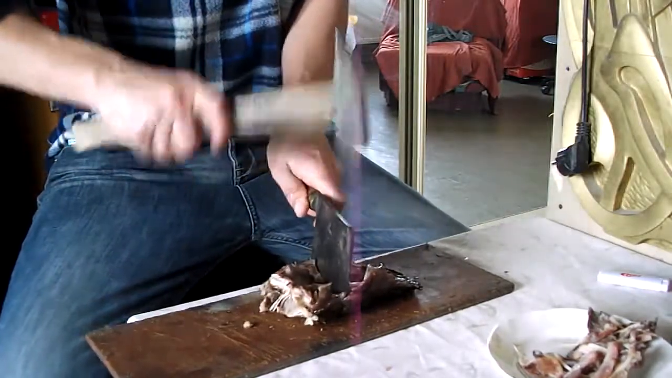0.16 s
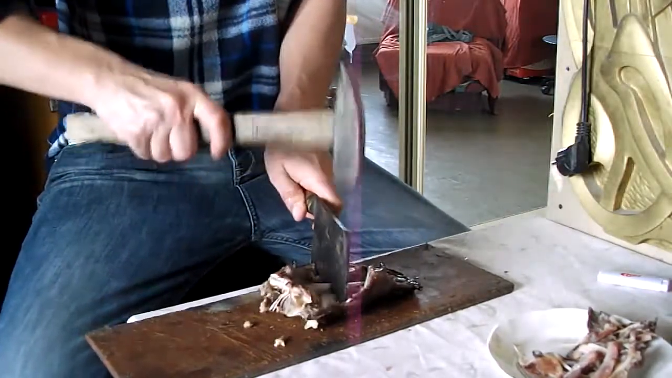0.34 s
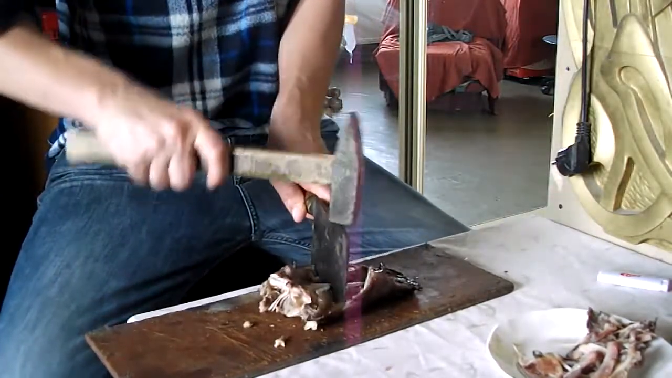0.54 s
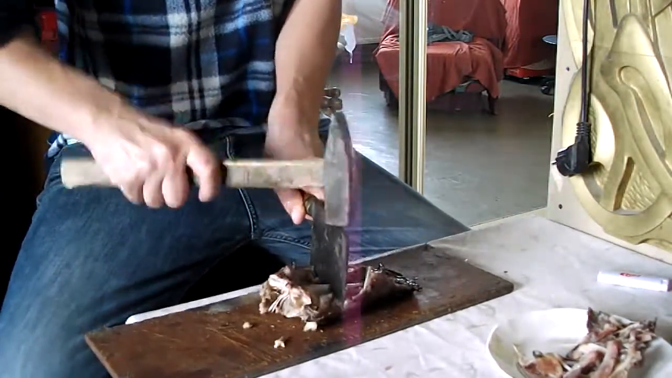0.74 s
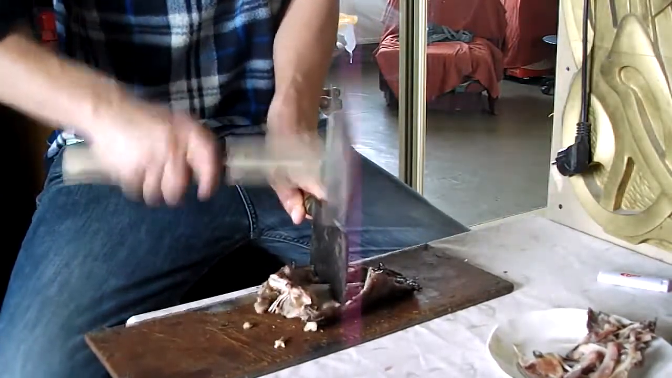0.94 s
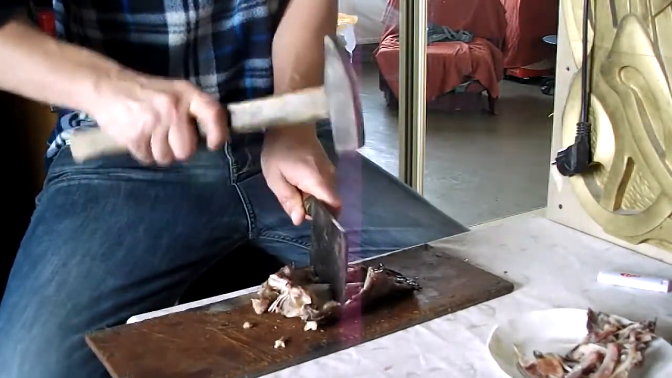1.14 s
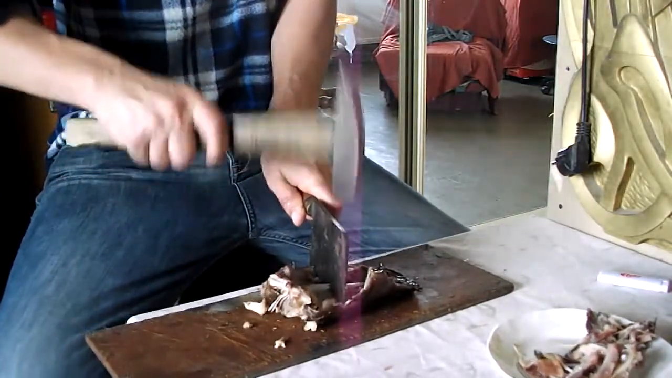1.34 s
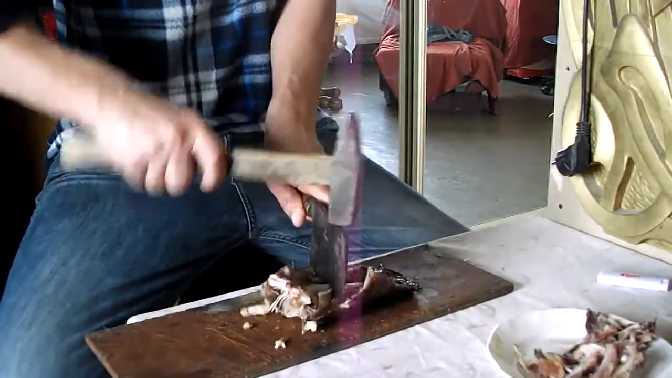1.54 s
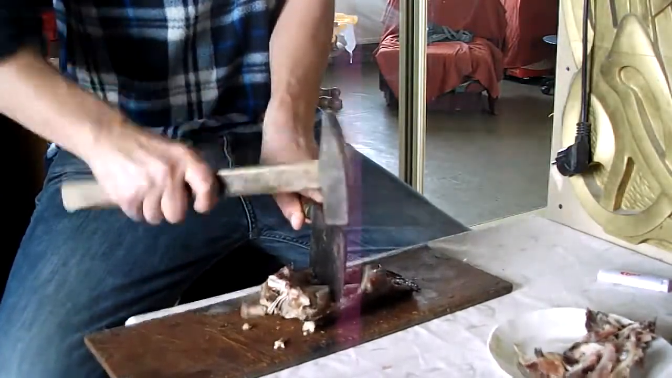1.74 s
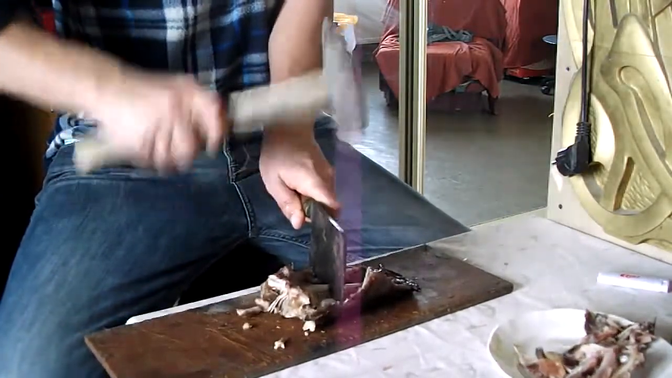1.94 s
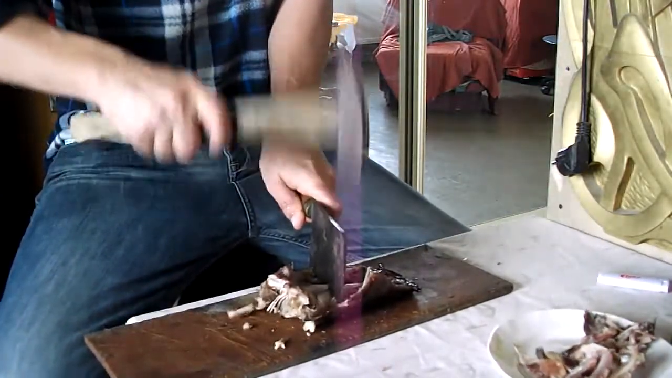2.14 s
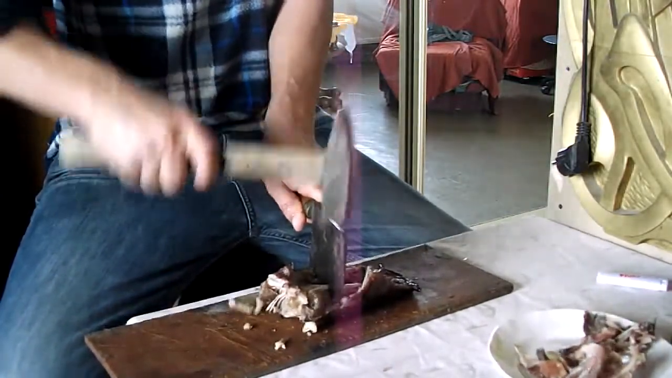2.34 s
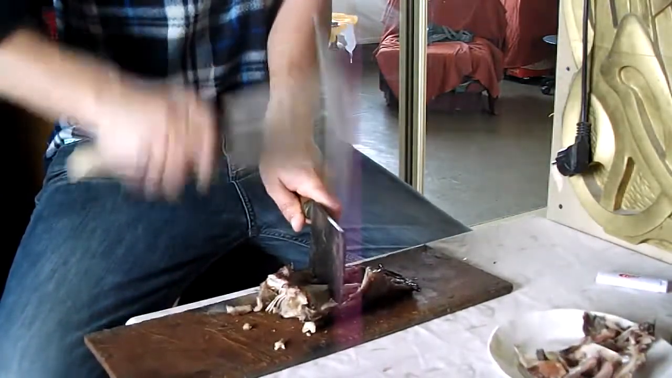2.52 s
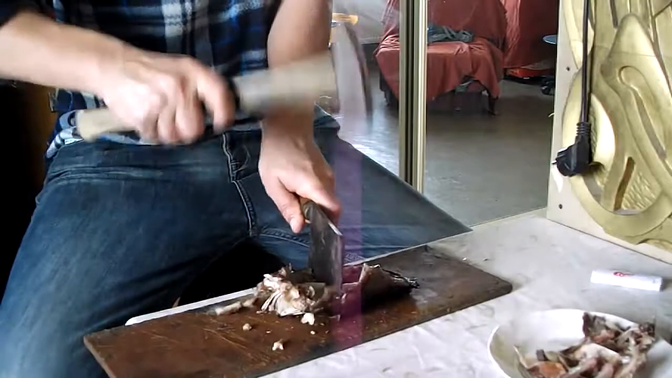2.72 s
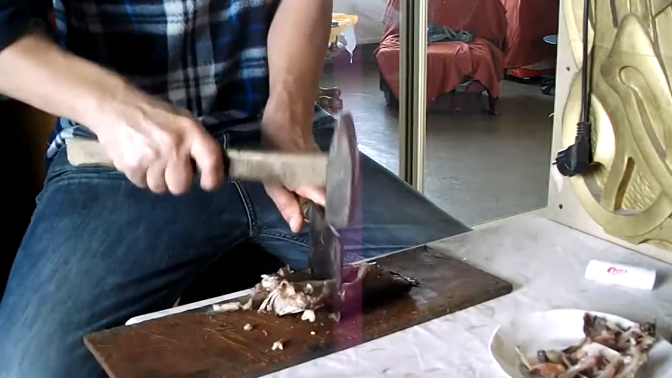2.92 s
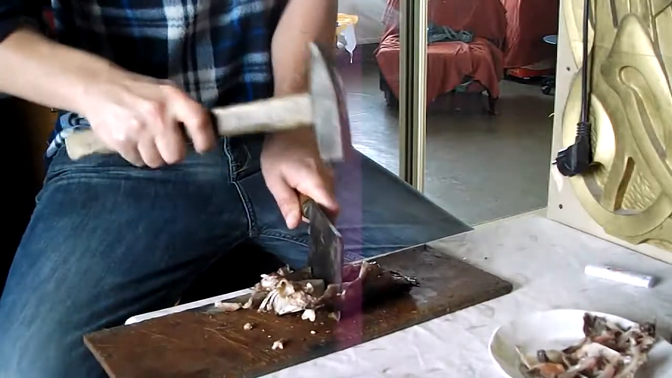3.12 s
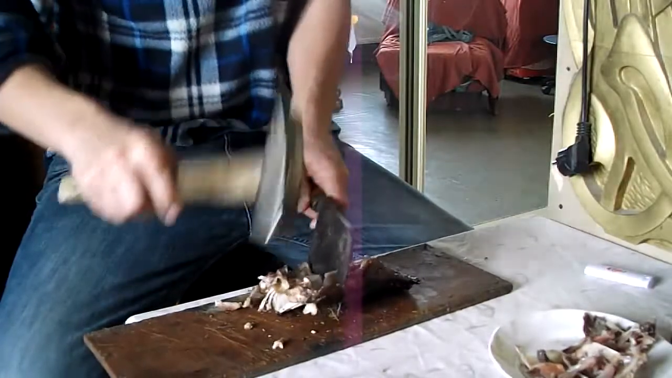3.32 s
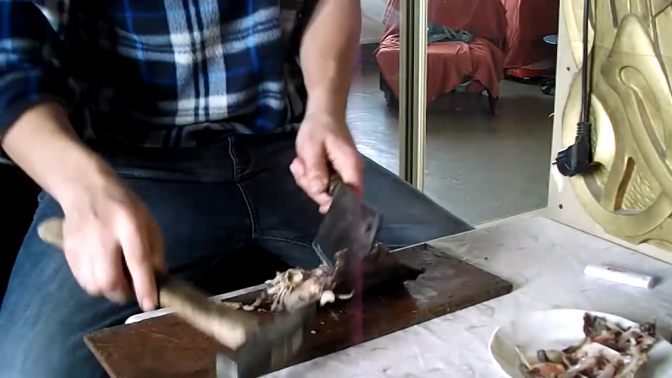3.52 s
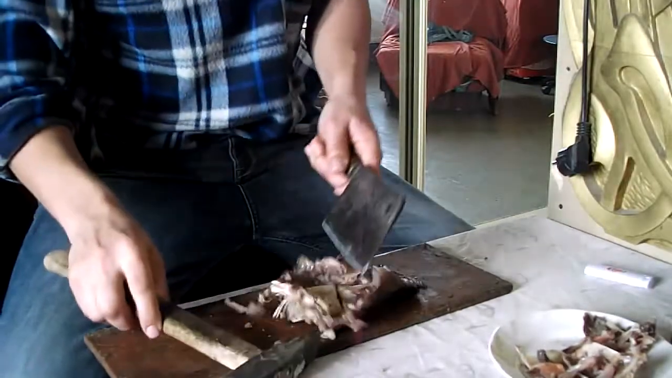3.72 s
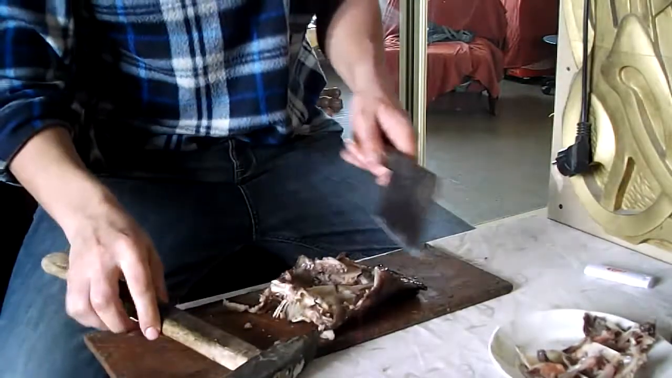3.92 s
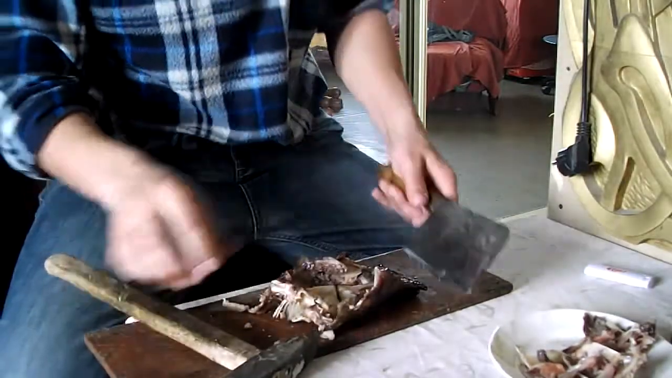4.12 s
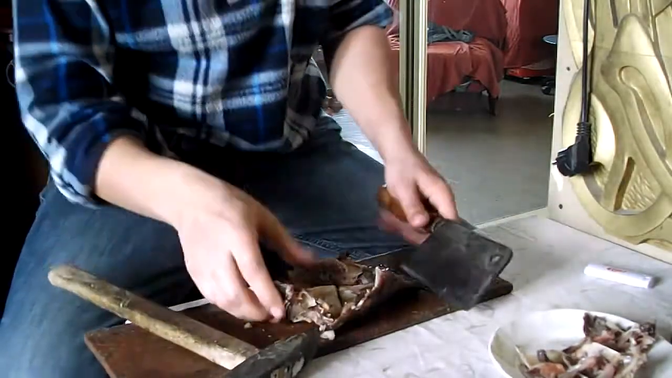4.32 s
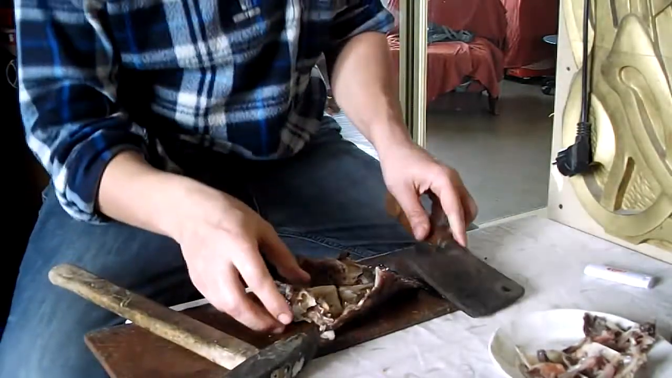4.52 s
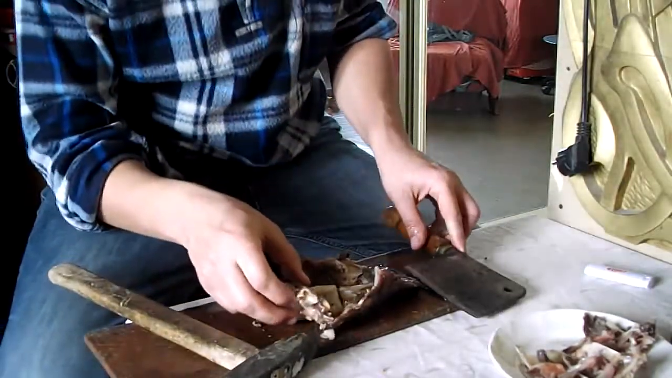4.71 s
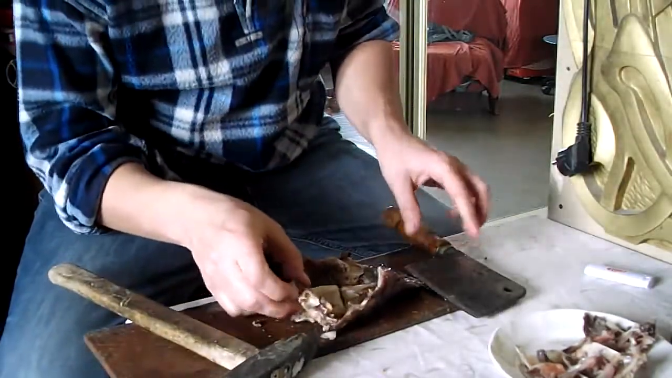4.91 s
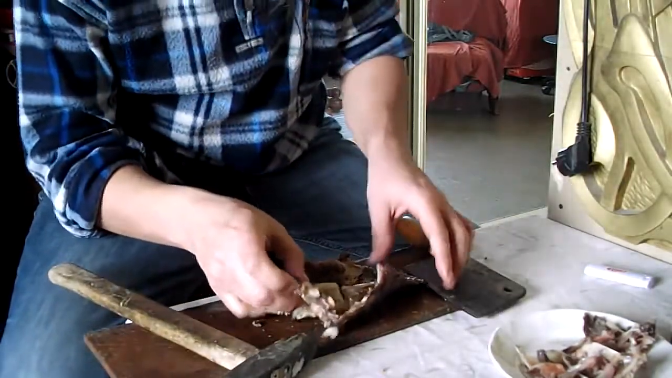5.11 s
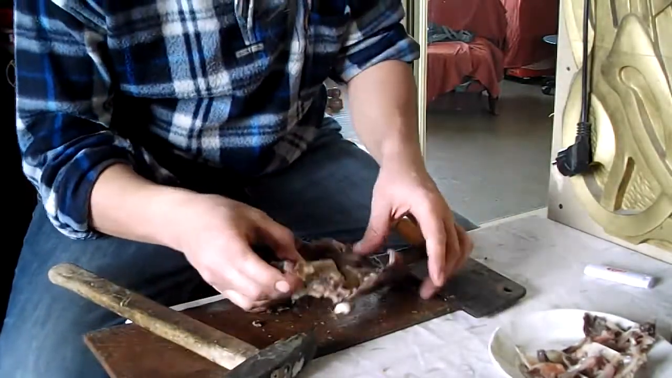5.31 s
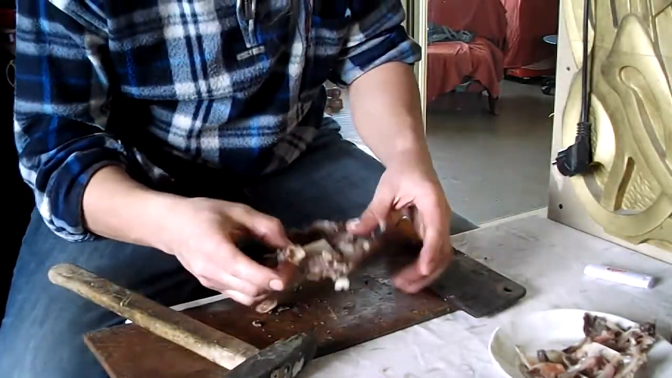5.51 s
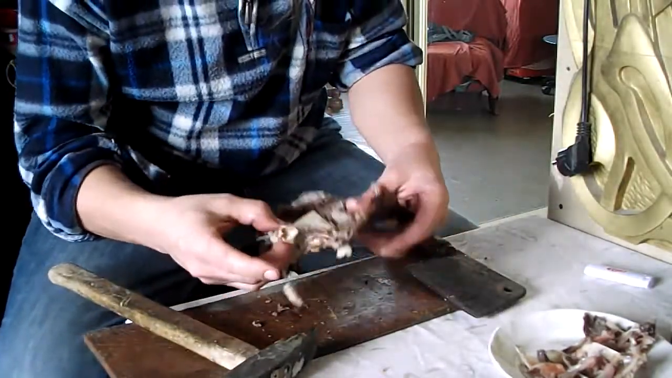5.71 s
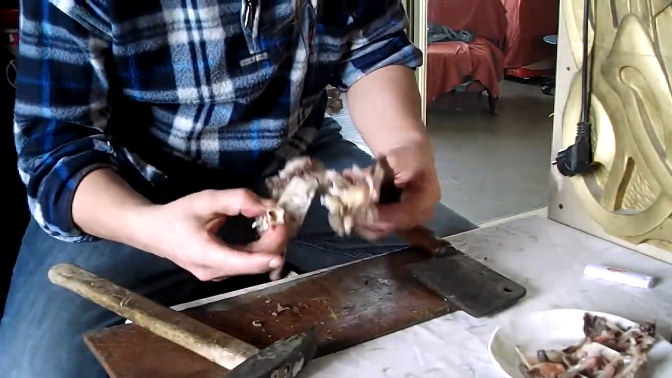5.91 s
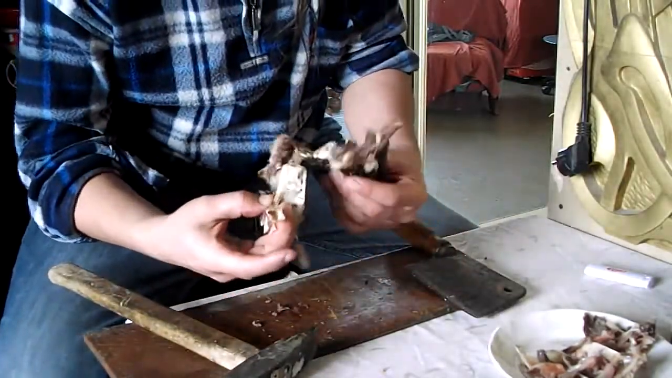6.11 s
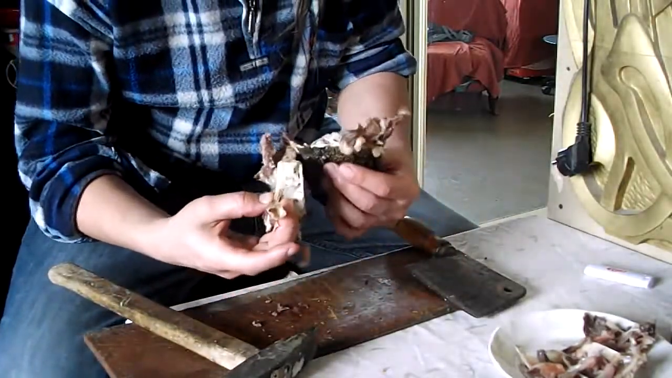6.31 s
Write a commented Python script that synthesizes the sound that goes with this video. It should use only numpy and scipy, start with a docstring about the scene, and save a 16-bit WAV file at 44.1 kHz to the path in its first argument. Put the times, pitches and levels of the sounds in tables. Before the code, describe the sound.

Regular hammering is already under way: bright steel clanks at first, then duller, heavier crunches as the blade wedges into bone over a wooden board. It stops around three seconds. A short scrape, clattering tools, a hard knock, soft rubbing and brittle cracks follow. The close microphone overloads on the blows, then automatic gain brings up hiss and electronic whine in a small hard room.

```python
"""A hammer drives a steel cleaver through a cooked fish bone on a wooden board: a steady run of blows in a bare kitchen.
Each blow is crunching noise, damped modes of blade and board, and a table swing; it overloads the close camera.
The gain control ducks, then lets filtered-noise hiss and a thin whine of sines back up. The blade scrapes free,
hammer and cleaver knock on the board, and hands rub and pull the bone apart in small wet snaps of resonant noise."""
import sys
import numpy as np
from scipy import signal
from scipy.fft import rfft, irfft, next_fast_len
from scipy.io import wavfile
from scipy.ndimage import map_coordinates

SR = 44100
rng = np.random.default_rng(int(sys.argv[2]) if len(sys.argv) > 2 else 0)


def dump(signal):
    """Clip the signal to [-1, 1] and save it as 16-bit WAV at the path in sys.argv[1]."""
    limited = np.clip(np.atleast_2d(signal).T, -1, 1)
    pcm = np.round(limited * 32767).astype(np.int16)
    wavfile.write(sys.argv[1], SR, pcm)


N = 284483
T = np.arange(SR * 3 // 4) / SR  # time axis of one event, in seconds

# spectrum of steel on steel and crushed bone: f/Hz, relative level per Hz/dB
CRUNCH_SPECTRUM = [(30, -21), (100, -6), (240, -11), (430, -1), (750, -6.5), (1250, -7.5), (1800, -0.5),
                   (3400, 0.5), (5400, -1.5), (7000, -10.5), (9000, -16), (11300, -11.5), (12200, -39.5)]


def amp(db):
    """Level to amplitude: 20 dB is a factor of ten."""
    return 10 ** (np.asarray(db) / 20)


def along(points, hz):
    """Interpolation of (f/Hz, value) points on a logarithmic frequency axis, as hearing scales pitch."""
    f, value = np.transpose(points)
    return np.interp(np.log(hz + 1), np.log(f), value)


def filtered(x, response):
    """Linear filtering: the spectrum is multiplied by a response of frequency."""
    n = x.shape[-1]
    padded = next_fast_len(n + 8192)
    spectrum = rfft(x, padded) * response(np.fft.rfftfreq(padded, 1 / SR))
    return irfft(spectrum, padded)[..., :n]


def noise(response, size):
    """Coloured noise: white noise shaped by a filter and scaled to rms 1."""
    x = filtered(rng.standard_normal(size), response)
    return x / x.std()


def fade(t60, t=T):
    """Exponential damping: the level falls 60 dB in t60 seconds."""
    return np.exp(-np.log(1000) * t / t60)


def add(track, s, sound):
    """Superposition: a sound is mixed into the track from time s on."""
    start = round(s * SR)
    part = sound[max(-start, 0):N - start]
    track[max(start, 0):][:len(part)] += part


def ring(modes, scatter_db, detune):
    """Modal synthesis: damped sines whose strength and pitch shift with the point of contact and the grip."""
    hz, db, t60 = np.transpose(modes)[:, :, None]
    size, shift = rng.standard_normal((2, len(modes), 1))
    side = (-1) ** np.arange(len(modes))[:, None]  # neighbouring modes swing opposite ways
    strength = side * amp(db + scatter_db * size)
    swing = np.sin(2 * np.pi * hz * (1 + detune * shift) * T)
    return np.sum(strength * fade(t60) * swing, 0)


def contact(spectrum, tilt_db, t60):
    """Impact noise: a hard contact is a short burst; tilt_db per octave brightens it."""
    colour = lambda hz: amp(along(spectrum, hz) + tilt_db * np.log2(hz + 200))
    return noise(colour, len(T)) * fade(t60)


def in_kitchen(x, wet_db, blur=0.045, build=0.014, late_db=-27, late_t60=0.57):
    """Reverberation: a diffuse echo of the sound's colour, blurred by a share of each frequency, joins it."""
    # room decay: f/Hz, t60/s
    kitchen_decay = [(100, 0.25), (500, 0.27), (2200, 0.25), (5000, 0.28), (8000, 0.23), (12000, 0.21)]
    grid = np.fft.rfftfreq(len(T), 1 / SR)
    cumulative = np.cumsum(np.abs(rfft(x)) ** 2)
    energy_below = lambda hz: np.interp(hz, grid, cumulative)
    reach = 12 + blur * grid
    colour = np.sqrt(np.abs(energy_below(grid + reach) - energy_below(grid - reach)) / reach)
    diffuse = noise(lambda hz: np.interp(hz, grid, colour), len(T))
    hz, t, z = signal.stft(diffuse, SR, nperseg=256)
    early = fade(along(kitchen_decay, hz)[:, None], t)
    late = amp(late_db) * fade(late_t60, t)  # the next room rings longer
    tail = signal.istft(z * (early + late), SR, nperseg=256)[1][:len(T)]
    tail *= 1 - np.exp(-(T / build) ** 2)  # the echo builds up as the first walls answer
    return x + amp(wet_db) * tail * np.linalg.norm(x) / np.linalg.norm(tail)


def background(hiss_db=-50):
    """Stationary noise and tones: room tone with microphone hiss, and a buzzing whine of close sines that beat."""
    # room tone and microphone hiss: f/Hz, relative level per Hz/dB
    hiss_spectrum = [(25, 5.5), (120, -1.5), (260, -4.5), (520, -8.5), (1100, -14), (2500, -18.5),
                     (4800, -10.5), (7200, -19), (8900, -5), (10000, -15.5), (11400, -15.5), (12300, -29.5),
                     (15500, -49.5)]
    # whine of the camera electronics: f/Hz, rms level ahead of the gain control/dB
    whine_lines = [(10632, -68), (10713, -56.5), (10794, -69), (10880, -66.5)]
    t = np.arange(N) / SR
    whine = np.zeros(N)
    for hz, db in whine_lines:
        whine += amp(db) * np.sqrt(2) * np.sin(2 * np.pi * (hz * t + rng.random()))
    return amp(hiss_db) * noise(lambda hz: amp(along(hiss_spectrum, hz)), N) + whine


def handling(lumps_db=3, lump_hz=160, dull_hz=10000):
    """Friction noise: hands, sleeves and bone rub on the board; the low part comes in uneven pushes."""
    # dull rubbing: f/Hz, relative level per Hz/dB
    rub_spectrum = [(25, 4), (140, -3.5), (350, -14), (900, -23.5), (3000, -18), (9000, -28)]
    # hands and arms shifting on the board: t at the strongest/s, relative level/dB
    moves = [(3.42, -41.5), (3.64, -41.5), (4.378, -40.5), (5.051, -40.5), (6.25, -43)]
    reach_db_per_s, settle_db_per_s = 119, 20.5  # each move swells quickly and dies away slowly
    t = np.arange(N) / SR
    swells = []
    for s, db in moves:
        swells.append(db - np.maximum(reach_db_per_s * (s - t), settle_db_per_s * (t - s)))
    level_db = np.max(swells, axis=0)
    # random points 1000 samples apart, joined by a smooth curve
    lumps = map_coordinates(rng.standard_normal(N // 1000 + 4), [np.arange(N) / 1000])
    rub = noise(lambda hz: amp(along(rub_spectrum, hz)) / (1 + (hz / dull_hz) ** 4), N)
    low = filtered(rub, lambda hz: 1 / (1 + (hz / lump_hz) ** 2))
    return amp(level_db) * (rub - low + amp(lumps_db * lumps) * low)


def gritty(centre_hz, sharpness, t60, grit_db=3.0, swell=0.022):
    """Resonant excitation: a snap or scrape is a gritty burst in one resonance of the bone."""
    def resonance(hz):
        return 1j * hz * centre_hz / (sharpness * (centre_hz ** 2 - hz ** 2) + 1j * hz * centre_hz)
    coarse = T[::40]
    grit = amp(grit_db * np.interp(T, coarse, rng.standard_normal(len(coarse))))
    burst = noise(lambda hz: resonance(hz) * amp(along(CRUNCH_SPECTRUM, hz)), len(T)) * grit * fade(t60)
    burst *= 1 - np.exp(-T / (swell * t60))  # long scrapes start softly
    return in_kitchen(burst, wet_db=-6.0)


def scraping(t60=0.83):
    """Sliding friction: steel is drawn out of the bone and along the board, a long burst for each slide."""
    # slides: t/s, relative level/dB, centre f/Hz, sharpness Q
    scrapes = [(3.374, -39.5, 4840, 3.2), (3.499, -38, 4400, 1.1), (3.6, -39, 3930, 11)]
    track = np.zeros(N)
    for s, db, centre_hz, sharpness in scrapes:
        add(track, s, amp(db) * gritty(centre_hz, sharpness, t60))
    return track


def snapping(count=5, scatter_db=3):
    """Brittle fracture: bone and gristle give single snaps, and a loose string of faint ticks while the bone tears."""
    # snaps: t/s, relative level/dB, centre f/Hz, sharpness Q
    snaps = [(3.27, -23.5, 3250, 3.9), (3.287, -30.5, 3200, 6), (3.904, -37.5, 5600, 16),
             (4.25, -25, 5500, 3.4), (4.926, -43, 1050, 22), (5.257, -28, 5330, 9.3),
             (5.686, -33, 3330, 22), (5.701, -27, 3500, 8.4), (5.949, -32, 5300, 2.8),
             (6.013, -27, 4280, 1), (6.385, -32, 4450, 1.8)]
    snap_t60_s, t60_s_per_q = 0.019, 0.0011  # a dry crack's length; sharper squeaks last longer
    tear_s, tear_length_s = 5.8, 0.21  # the bone is pulled in two
    fibre_db, fibre_hz, fibre_q = -41.5, 4400, 1.3  # small fibres part meanwhile; level and pitch scatter
    track = np.zeros(N)
    for s, db, centre_hz, sharpness in snaps:
        t60 = snap_t60_s + t60_s_per_q * sharpness
        add(track, s, amp(db) * gritty(centre_hz, sharpness, t60))
    for k, (when, size, pitch) in enumerate(rng.uniform(-1, 1, (count, 3))):
        s = tear_s + tear_length_s * (k + .5 + when / 2) / count
        tick = gritty(fibre_hz * 2 ** (pitch / 2), fibre_q, snap_t60_s)
        add(track, s, amp(fibre_db + scatter_db * size) * tick)
    return track


def board(push):
    """Modal response of a plate: the wood takes up the force over push seconds and thumps."""
    # board and the table under it: f/Hz, relative level/dB, t60/s
    board_modes = [(79, -33.5, 0.32), (120, -25.5, 0.09), (156.1, -8, 0.098), (208, -20.5, 0.062),
                   (281.7, -27.5, 0.076), (378.3, -15, 0.1), (469, -18.5, 0.041), (848, -13.5, 0.1),
                   (937, -18.5, 0.12), (1184, -25, 0.23)]
    return ring(board_modes, scatter_db=3.0, detune=0.005) * (1 - np.exp(-T / push))


def blade(bend_db, ring_db):
    """Modal response of a steel blade: its low bending modes clack and its high modes ring."""
    # cleaver blade: f/Hz, relative level/dB, t60/s
    blade_modes = [(1525, -15, 0.035), (1641, -11.5, 0.03), (1817, -6, 0.02), (2012, -11, 0.035),
                   (2005, -12, 0.033), (2414, -24.5, 0.2), (2676, -22.5, 0.028), (3012, -14, 0.06),
                   (3900, -31, 0.073), (3984, -9, 0.052), (4670, -12.5, 0.07), (7640, -26, .08),
                   (8150, -18, 0.23), (9180, -27.5, 0.093), (10840, -28.5, .12), (10350, -31.5, .16)]
    modes = []
    for hz, db, t60 in blade_modes:
        modes.append((hz, db + (bend_db if hz < 2300 else ring_db), t60))
    return ring(modes, scatter_db=4.0, detune=0.0018)


def laying_down():
    """Contact stiffness: hammer and cleaver meet the wood more slowly; the softer the contact, the duller."""
    # tools on the board: t/s, knock level/dB, board level/dB, steel level/dB, dull above f/Hz, slap t60/s
    # (board and steel levels are relative to the knock)
    knocks = [(3.569, -24.5, 13, 12.5, 890, 0.038), (3.595, -23.5, -19, 6.5, 7200, 0.053),
              (4.191, -16, 6, -25.5, 1190, 0.087), (4.468, 6.5, -5, -40, 4300, 0.035),
              (4.649, -31, 8, -12, 700, 0.15)]
    # flat steel slapping wood: f/Hz, relative level per Hz/dB
    slap_spectrum = [(40, -14.5), (150, -1.5), (270, 4), (450, 4), (680, 3.5), (850, -8.5), (1130, 2),
                     (1550, -2), (2300, 0), (3500, -2), (5000, -3.5), (7000, -13.5), (11000, -42),
                     (12300, -45.5)]
    track = np.zeros(N)
    for s, db, board_db, steel_db, dull_hz, t60 in knocks:
        soft = signal.butter(2, min(dull_hz, SR / 3), fs=SR)
        slap = signal.lfilter(*soft, contact(slap_spectrum, 0, t60) + blade(steel_db, steel_db))
        damped = board(push=0.00067) * fade(0.3)  # the resting tool damps the wood
        thump = signal.lfilter(*soft, amp(board_db) * damped)
        add(track, s, amp(db) * (in_kitchen(slap, wet_db=-7.5) + in_kitchen(thump, wet_db=-5.5)))
    return track


def shove(push_hz=55, t60=0.022):
    """Heavily damped oscillator: a blow pushes the table down in one short low swing."""
    return np.sin(2 * np.pi * push_hz * T) * fade(t60)


def sway(sway_hz=19, sway_db=-29, t60=0.84):
    """Mass on springs: noise through a low resonance lets the table sway and rumble on its legs after a blow."""
    def legs(hz):
        resonance = hz / (sway_hz ** 2 - hz ** 2 + 1j * hz * sway_hz / 4)  # Q of 4
        return resonance / (1 + (hz / 120) ** 2)
    return amp(sway_db) * fade(t60) * noise(legs, len(T))


def hammering():
    """Impact and modal coupling: each blow rings the blade and drives it through the bone into the board."""
    # hammer on the cleaver's back: t/s, blow level/dB, board level/dB, table shove and sway level/dB, crunch t60/s
    # (board and table levels are relative to the blow; the table moves more or less from blow to blow)
    blows = [(-.085, 28.5, -4, -4, 0.025), (.17, 23, -7.5, -32, 0.056), (.419, 21.5, 9.5, -7, 0.073),
             (.6696, 21.5, 10.5, -8.5, 0.082), (.9096, 30.5, 7.5, -8, 0.03), (1.1643, 32, 9, -20, 0.056),
             (1.419, 40.5, 4, -13.5, 0.035), (1.6797, 34, 6, -18, 0.1), (1.9551, 36, 8.5, -11, 0.064),
             (2.226, 37, 4.5, -8, 0.051), (2.5024, 38, -8, -6, 0.063), (2.7763, 31.5, 11, -3.5, .19)]
    # The blade starts loose on top of the bone; every blow wedges it deeper.
    wedging_blows = 2.2  # blows until its looseness has fallen to 1/e
    wedged_bend_db, loose_bend_db = 5, -19  # low clack of the wedged blade; change when loose
    wedged_ring_db, loose_ring_db = -4, 7  # high ring of the wedged blade; change when loose
    wedged_tilt_db, loose_tilt_db = -1, 4  # crunch brightness per octave when wedged; change when loose
    break_bend_db = 5  # the last blow breaks through and bends the blade harder
    cushion = signal.butter(1, 415, fs=SR)  # the bone softens the blow: the board gets little above 415 Hz
    track = np.zeros(N)
    for k, (s, db, board_db, table_db, t60) in enumerate(blows):
        loose = np.exp(-max(k - 1, 0) / wedging_blows)  # the edge bites after the first two blows
        bend_db = wedged_bend_db + loose_bend_db * loose
        if k == len(blows) - 1:
            bend_db += break_bend_db
        ring_db = wedged_ring_db + loose_ring_db * loose
        tilt_db = wedged_tilt_db + loose_tilt_db * loose
        crunch = in_kitchen(contact(CRUNCH_SPECTRUM, tilt_db, t60), wet_db=-5.5)
        steel = in_kitchen(blade(bend_db, ring_db), wet_db=-12.5, blur=0.009)
        thump = in_kitchen(signal.lfilter(*cushion, board(push=0.014)), wet_db=-9.0)
        table = shove() + sway()
        add(track, s, amp(db) * (crunch + steel + amp(board_db) * thump + amp(table_db) * table))
    return track


def scene():
    """Superposition: everything reaches one microphone, which feeds both channels."""
    mono = background() + handling() + scraping() + snapping() + laying_down() + hammering()
    return np.array([mono, mono])


def gain_control(x, target_db=-4, release_db=50, attack=0.0081, start_db=27):
    """Compression: gain drops within milliseconds above the target level and creeps back at release_db a second."""
    power = signal.lfilter(np.ones(128) / 128, 1, x[0] ** 2)
    over_db = np.maximum(10 * np.log10(power + 1e-12) - target_db, 0)
    over_db[0] = start_db  # already ducked by the hammering under way
    creep_db = release_db * np.arange(N) / SR
    held_db = np.maximum.accumulate(over_db + creep_db) - creep_db
    pole = np.exp(-1 / (attack * SR))  # attack in seconds
    cut_db = start_db + signal.lfilter([1 - pole], [1, -pole], held_db - start_db)
    return x * amp(-cut_db)


def record(dry, hardness=7, top=0.96, top_hz=15900):
    """Saturation: gain control comes too late for each attack, which clips; the left channel runs one sample behind."""
    x = gain_control(dry)
    left, right = x / (1 + np.abs(x / top) ** hardness) ** (1 / hardness)
    pair = np.array([np.pad(left, (1, 0))[:N], right])
    return filtered(pair, lambda hz: 1 / (1 + (hz / top_hz) ** 120))  # steep low-pass at top_hz


dry = scene()
out = record(dry)
dump(out)
```